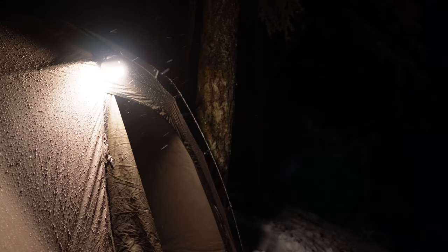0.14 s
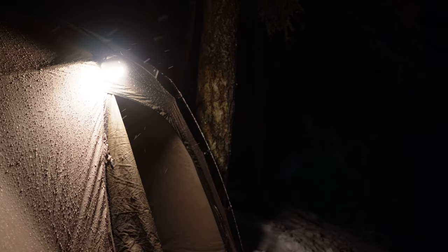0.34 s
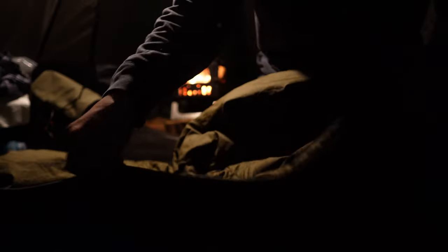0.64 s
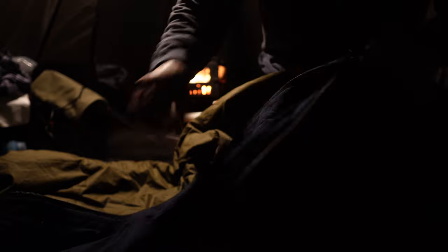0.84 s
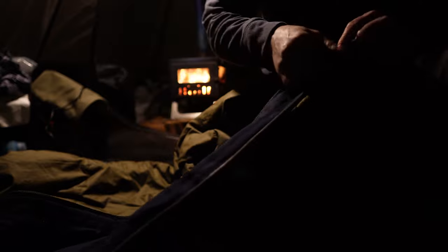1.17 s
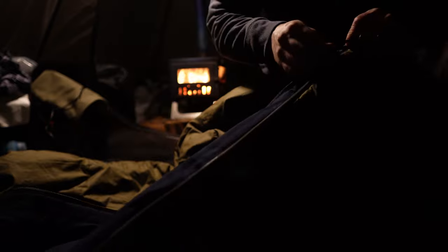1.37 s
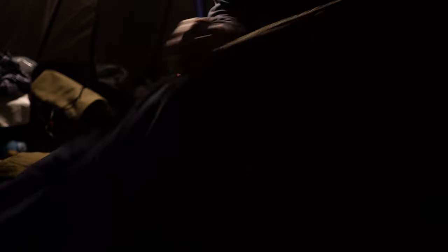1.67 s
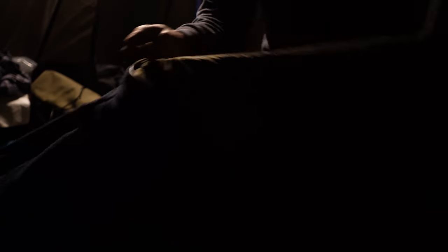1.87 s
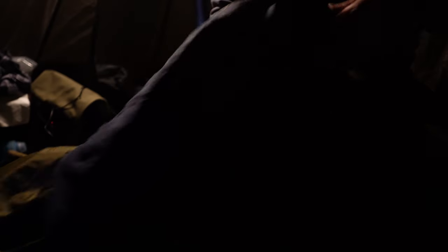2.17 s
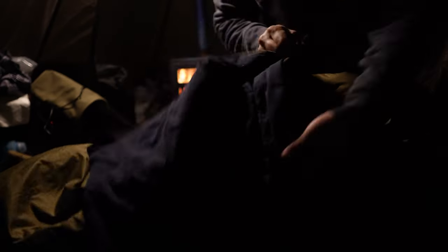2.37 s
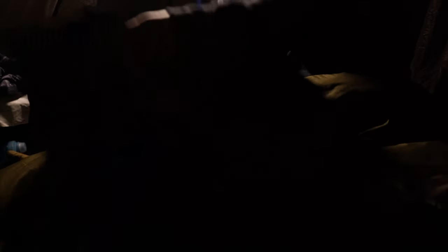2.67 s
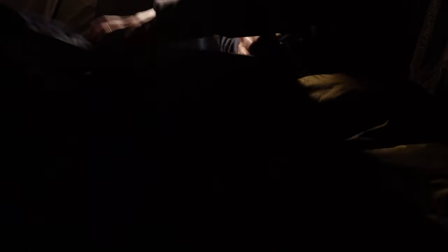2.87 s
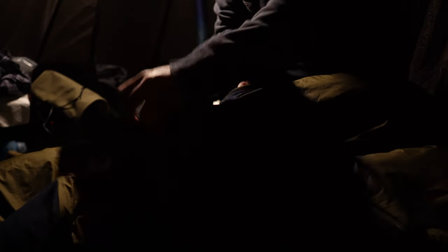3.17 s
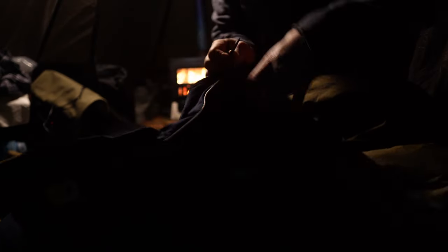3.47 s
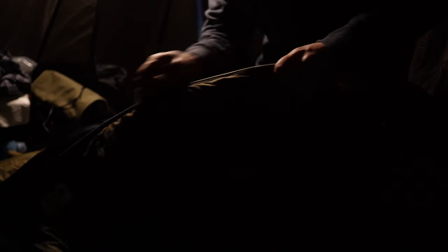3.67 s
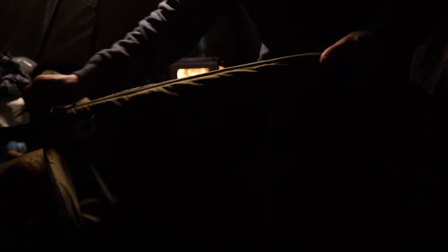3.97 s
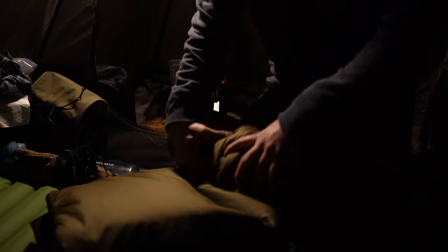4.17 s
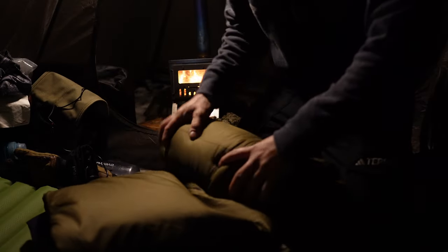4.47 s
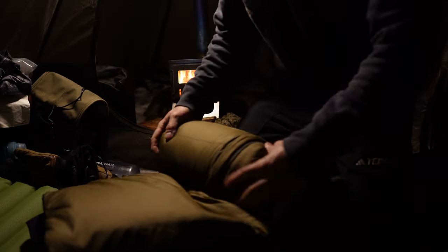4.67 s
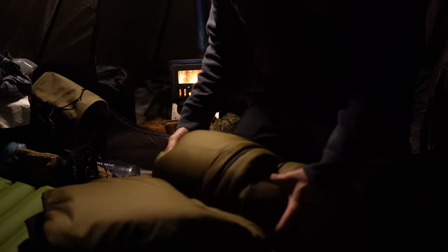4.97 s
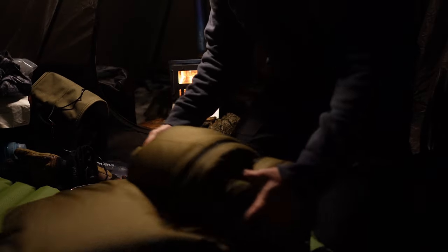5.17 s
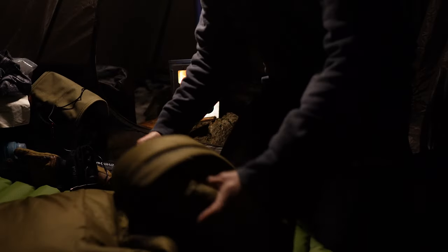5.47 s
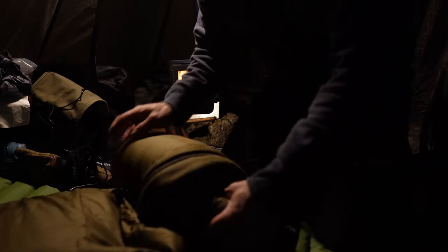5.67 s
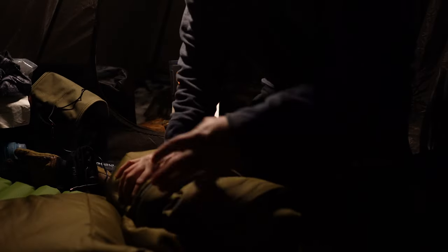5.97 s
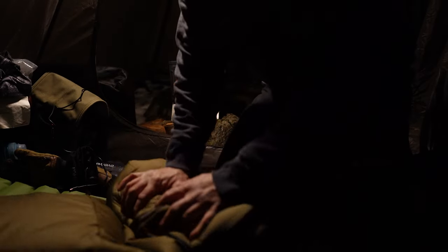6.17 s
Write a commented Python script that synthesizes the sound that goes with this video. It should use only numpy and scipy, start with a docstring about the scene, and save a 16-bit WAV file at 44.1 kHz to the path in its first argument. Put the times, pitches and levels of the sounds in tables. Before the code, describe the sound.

For half a second, wind buffets the microphone and sleet ticks on a tent wall. Then, inside the tent, nylon sleeping bags swish and crumple close to the microphone, with sharp little snaps. A zipper buzzes in a quick pull, its tab clicks, and a second pull follows. The rustling goes on in stronger strokes as a bag is rolled, over a faint low stove rumble.

```python
"""Nylon sleeping bags shaken out, zipped and rolled inside a tent, close to a single microphone.
Two zipper pulls buzz at the tooth rate; the sliding cloth swishes, crumples and snaps, and a stove
rumbles softly behind. The first half second is outside the tent, where wind buffets the microphone
and sleet ticks on the wall."""
import sys
import numpy as np
from scipy import signal
from scipy.fft import rfft, irfft
from scipy.io import wavfile
from scipy.ndimage import uniform_filter1d

SR = 44100
rng = np.random.default_rng(int(sys.argv[2]) if len(sys.argv) > 2 else 0)


def to_wav(sig):
    """Store sig (one row per channel, or 1-D mono) as 16-bit WAV at the path in sys.argv[1].

    Samples outside -1..1 are clipped; the rate is SR.
    """
    pcm = np.clip(np.atleast_2d(sig), -1, 1) * 32767
    pcm = np.round(pcm).astype(np.int16)
    wavfile.write(sys.argv[1], SR, pcm.T)  # frames by channels


N = 279153
T = np.arange(N) / SR
INSIDE_S = .4745  # from here on the microphone is in the tent


def undb(db):
    return 10 ** (np.asarray(db) / 20)


def unit(x):
    return x / np.sqrt(np.mean(x ** 2))


def curves(table):
    """A gate that is open while the table lasts, and its columns on the sample grid."""
    s, *columns = np.transpose(table)
    gate = uniform_filter1d(1. * ((T > s[0]) & (T < s[-1])), size=64)
    return gate, [np.interp(T, s, c) for c in columns]


def colour(x, points):
    """Causal filter shaped by (f/Hz, level/dB) points; the result has unit RMS."""
    hz, db = np.transpose(points)
    f = np.maximum(np.fft.rfftfreq(8192, 1 / SR), 1)
    gain_db = np.interp(np.log(f), np.log(hz), db, left=-60, right=-60)
    cepstrum = irfft(gain_db * np.log(10) / 20)
    cepstrum[1:4096] *= 2  # folding gives minimum phase
    cepstrum[4097:] = 0
    return unit(signal.fftconvolve(x, irfft(np.exp(rfft(cepstrum))))[:N])


def ring(x, hz, width):
    """One resonance, gain 1 at its centre."""
    return signal.lfilter(*signal.iirpeak(hz, hz / width, SR), x)


def walk(rate):
    """Random levels held 1 / rate s and slewed; spread near 1."""
    k = int(SR / rate)
    return 1.18 * uniform_filter1d(np.repeat(rng.standard_normal(N // k + 1), k), k)[:N]


def grains(per_s, spread_db, mix_db):
    """Smooth noise plus scattered slips of unequal but bounded size."""
    size = undb(spread_db * np.minimum(rng.exponential(size=N), 3))
    slip = (rng.random(N) < per_s / SR) * rng.uniform(-1.01, 1, N) * size
    return rng.standard_normal(N) + undb(mix_db) * unit(slip)


def hits(table, crack, t60=None):
    """A damped ring for each row; crack adds a sharp push and a noise burst around its pitch."""
    out, t = np.zeros(N + SR), np.arange(SR // 2) / SR
    push = 1.77 * np.exp(-(t / 0.00006 - 2) ** 2)
    for s, db, hz, *own_t60 in table:
        fade = undb(-60 * t / (own_t60[0] if own_t60 else t60))
        burst = 3.35 * ring(rng.standard_normal(len(t)), hz, 0.8 * hz)
        hit = fade * (np.sin(2 * np.pi * hz * t) + crack * burst) + crack * push
        out[int(s * SR):][:len(t)] -= undb(db) * hit / np.abs(hit).max()
    return out[:N]


# low roar behind the bags: f/Hz, level/dB
RUMBLE_COLOUR = [(20, -10), (40, -6), (70, -4), (110, -3), (190, -2.5), (260, -11.5), (400, -27)]
# soft knocks through the tent floor: t/s, peak level/dB, f/Hz, t60/s
FLOOR_KNOCKS = [(2.209, -33.5, 56.18, 0.13), (5.029, -46, 48.4, 0.2), (5.249, -53, 83.9, 0.2),
                (5.589, -33, 38.1, 0.15)]


def stove_and_floor(stove_db=-54.5):
    """The stove roars low, bedding shifts as the cloth is crumpled, and knocks come through the floor."""
    since = T - INSIDE_S
    _, _, crumple = strokes()
    bedding = undb(-9.5) * crumple
    last_gust = undb(-35) * np.exp(-np.abs(since) / 0.028)  # the wind dies away on entering the tent
    strength = (since > 0) * np.sqrt(undb(stove_db) ** 2 + bedding ** 2 + last_gust ** 2)
    roar = colour(rng.standard_normal(N), RUMBLE_COLOUR) * undb(1.7 * walk(15))
    return strength * roar + hits(FLOOR_KNOCKS, crack=0)


# wind outside the tent: t/s, buffeting level/dB, wall hiss level/dB
WIND = [(0.0, -27, -55), (0.312, -27, -55.5), (.4745, -32.5, -51)]
# buffeting right on the microphone: f/Hz, level/dB
WIND_COLOUR = [(15, 4), (40, 0.5), (70, 0.5), (120, -16), (250, -31.5), (500, -46)]
# hiss on the tent wall: f/Hz, level/dB
WALL_COLOUR = [(400, 10.5), (1000, -5.5), (3000, -1.5), (5500, -4), (7000, -9), (16000, -23)]
# largest sleet grains on the wall: t/s, peak level/dB, f/Hz
SLEET = [(0.0538, -35, 2820), (0.0634, -37, 2580), (0.0784, -40, 5390), (0.1067, -35, 4770),
         (0.145, -35, 2700), (0.2174, -41, 2400), (0.282, -35, 2900), (0.315, -32, 3760),
         (0.3401, -39, 2710), (0.3736, -45, 2390)]


def wind_and_sleet():
    """Outside, gusts buffet the microphone while sleet hisses and ticks on the wall."""
    gate, (gust_db, hiss_db) = curves(WIND)
    gusts = colour(rng.standard_normal(N), WIND_COLOUR) * undb(gust_db + 1.3 * walk(20.3))
    hiss = colour(grains(400, 3.5, -0.58), WALL_COLOUR) * undb(hiss_db + 4.7 * walk(63.4))
    return gate * (gusts + hiss) + hits(SLEET, crack=0.71, t60=0.0088)


def tent_echoes(near, decay_s=0.011):
    """The tent walls return short, soft echoes of the sounds near the microphone."""
    t = np.arange(SR // 10) / SR
    tail = rng.standard_normal(len(t)) * np.exp(-t / decay_s)
    return undb(-31.5) * signal.fftconvolve(near, tail)[:N]


# faint squeaks on the bags: start t/s, end t/s, start f/Hz, end f/Hz, width/Hz, level/dB
SQUEAKS = [(0.701, 0.766, 791, 2627, 500, -40.5), (.885, 0.992, 3730, 3710, 200, -47),
           (.89, 0.99, 3070, 2880, 254, -46), (0.886, .99, 1610, 1515, 250, -46),
           (1.12, 1.214, 848, 885, 121, -45), (4.294, 4.343, 1490, 1915, 500, -37),
           (5.649, 5.712, 1514, 5490, 1180, -36.5), (5.782, 5.847, 2800, 3840, 1500, -35)]


def squeaks():
    """A finger or seam drawn across the weave sings: narrow noise gliding with the stroke's speed."""
    out = np.zeros(N)
    for start, end, from_hz, to_hz, width, db in SQUEAKS:
        i, n = int(start * SR), int((end - start) * SR)
        slow = uniform_filter1d(rng.standard_normal((2, SR // 4)), int(SR / width))[:, :n]
        phase = 2 * np.pi * np.cumsum(np.linspace(from_hz, to_hz, n)) / SR
        band = unit(slow[0] * np.cos(phase) + slow[1] * np.sin(phase))
        out[i:i + n] += undb(db) * np.hanning(n) ** .5 * band
    return out


# the zipper tab clicking, close: t/s, peak level/dB
TAB_CLICKS = [(2.5843, -15)]
# modes of the tab: f/Hz, relative level/dB, t60/s
TAB_MODES = [(990, -1, .02), (1525, 5.5, 0.023), (2020, 1, 0.022), (2520, -5, .015), (4540, -3, .022),
             (5470, -5, .01)]


def zipper_tab():
    """The tab strikes the slider and rings in a few small modes."""
    t, out = np.arange(SR // 10) / SR, np.zeros(N)
    for s, peak_db in TAB_CLICKS:
        click = sum(undb(db + 2.0 * rng.standard_normal() - 60 * t / t60) * np.sin(2 * np.pi * hz * t)
                    for hz, db, t60 in TAB_MODES)
        out[int(s * SR):][:len(t)] -= undb(peak_db) * click / np.abs(click).max()
    return out


# snaps close to the microphone: t/s, peak level/dB, f/Hz
SNAPS = [(0.4763, -17, 722), (0.4952, -15.5, 760), (0.7167, -20.5, 1680), (0.7477, -25, 1850),
         (0.8237, -29.5, 2147), (1.0547, -22.5, 2876), (1.2045, -23, 11700), (1.3499, -22, 1520),
         (1.3551, -28, 940), (1.3571, -16.5, 2520), (1.8191, -17, 1400), (2.2182, -18.5, 1120),
         (2.5297, -19, 1350), (3.0031, -29, 1030), (3.4881, -24.5, 4300), (3.5064, -25, 960),
         (3.5315, -18, 405), (4.2241, -19.5, 970), (4.4792, -16, 490), (4.5492, -23.5, 3606),
         (4.8274, -16, 3596), (5.229, -13, 2940), (5.2365, -16, 970), (5.2553, -23, 1203),
         (5.3285, -20, 486), (5.4705, -28, 1740), (5.5288, -19.5, 537), (5.5732, -15.5, 2200),
         (6.073, -19, 1290), (6.259, -15.5, 1258), (6.2977, -14.5, 565), (6.3226, -12.5, 890)]


def snaps():
    """Cloth and toggles snap with a crack and a very short ring."""
    return hits(SNAPS, crack=0.73, t60=0.011)


def scrape():
    """Strength of the slider's scrape on the tape: a power of the tooth rate, 1 at 1000 teeth a second."""
    return sum(gate * (hz / 1000) ** 0.91 for gate, (hz, _) in map(curves, (PULL_1, PULL_2)))


# hand strokes, close: fastest t/s, rise/s, fall/s, swish level/dB, sheen re swish/dB, crumple re swish/dB
STROKES = [(.49, 0.05, 0.099, -38.5, -6, -0.5), (.55, 0.056, 0.31, -40, -6.5, -5),
           (.74, 0.047, .07, -40, -6.5, -5.5), (.92, 0.16, 0.14, -43.5, -7.5, -9),
           (1.19, 0.18, 0.091, -41.5, -6, -7), (1.351, 0.057, 0.018, -43, -10, -12),
           (1.88, 0.11, 0.18, -37, -8, -4.5), (2.09, 0.16, 0.23, -38.5, -7.5, -1.5),
           (2.23, 0.079, 0.15, -37.5, -7.5, -6), (2.42, 0.22, 0.15, -37.5, -6, -4),
           (2.63, 0.074, 0.094, -40.5, -7, -3.5), (2.73, 0.097, 0.16, -39, -6, -6.5),
           (2.9, 0.15, 0.12, -40, -6.5, -5), (3.09, .13, 0.053, -40.5, -5, -2.5),
           (3.15, 0.052, 0.12, -52.5, -2.5, 3.5), (3.5, 0.02, 0.45, -39.5, -4, -1.5),
           (4.0, 0.046, 0.031, -30.5, -10, -9), (4.09, 0.056, 0.14, -35, -5.5, -6),
           (4.29, 0.23, 0.11, -35.5, -6, -2), (4.46, 0.12, 0.077, -32.5, -5.5, -11),
           (4.66, 0.21, 0.12, -35.5, -6.5, -6.5), (4.8, 0.21, 0.18, -32.5, -5, -9),
           (4.828, 0.016, 0.02, -30, -11.5, -13), (5.0, 0.097, 0.14, -38, -7.5, 2.5),
           (5.23, 0.19, 0.19, -31, -5.5, -2), (5.5, 0.19, 0.15, -39, -6, 1),
           (5.68, 0.063, 0.07, -38, -6, -4), (5.82, .1, 0.098, -37, -8, -11.5),
           (5.91, 0.11, 0.058, -36, -3.5, -2), (6.079, 0.036, 0.23, -37.5, -4.5, 0),
           (6.3, 0.1, .1, -38, -9.5, 3)]
RESTING_DB, SCRAPE_DB = (-50, -7.5, -3), (-34.5, -3.5, -9.5)  # the same three levels


def strokes(flank_power=1.146):
    """Strength of swish, sheen and crumple: hands and slider add as powers over the cloth at rest."""
    def powers(swish_db, sheen_db, crumple_db):
        return undb([[swish_db], [swish_db + sheen_db], [swish_db + crumple_db]]) ** 2

    power = powers(*RESTING_DB) + powers(*SCRAPE_DB) * scrape() ** 2
    for s, rise, fall, *db in STROKES:
        away = np.clip(np.where(T < s, (s - T) / rise, (T - s) / fall), 0, 1)
        power += powers(*db) * np.abs(np.cos(np.pi / 2 * away)) ** (2 * flank_power)
    return np.sqrt(power) * (T > INSIDE_S)


# nylon at close range, in its middle, top and low bands: f/Hz, level/dB
SWISH = [(1200, -9), (1800, 0.5), (2600, 2.5), (3800, 2), (5200, -0.5), (6500, -1), (8000, -16)]
SHEEN = [(5500, -22), (6800, -0.5), (8200, -3), (10000, -8), (12500, -8), (14800, -15), (16000, -14)]
CRUMPLE = [(150, -5.5), (260, 4), (420, 2), (800, 3), (1200, 0.5), (1700, -0.5), (2500, -15)]


def cloth():
    """Nylon slides on nylon: the same fibre slips feed swish and sheen, larger folds crumple lower."""
    fibres, folds = grains(2000, 1.3, -7.5), grains(200, 5.8, -3.5)
    drag = walk(30)  # the sliding speed is never even
    swish = colour(fibres + 0.34 * folds, SWISH) * undb(0.81 * drag + 0.53 * walk(90))
    sheen = colour(fibres, SHEEN) * undb(1.2 * drag + 0.622 * walk(90))
    crumple = colour(folds, CRUMPLE) * undb(2.0 * drag + 1.02 * walk(40))
    top_hiss = unit(ring(rng.standard_normal(N), hz=12500, width=4400))
    slider_hiss = undb(SCRAPE_DB[0] - 11.5) * scrape() * top_hiss
    return np.sum(strokes() * [swish, sheen, crumple], axis=0) + slider_hiss


# the two zipper pulls, close to the microphone: t/s, tooth rate f/Hz, drive level/dB
PULL_1 = [(1.49, 140, -59), (1.524, 267, -49.5), (1.58, 640, -31.5), (1.62, 930, -26), (1.66, 1130, -24.5),
          (1.7, 1170, -28.5), (1.74, 1124, -28), (1.76, 920, -32), (1.785, 760, -41), (1.805, 490, -38),
          (1.85, 440, -40.5), (1.9, 280, -61)]
PULL_2 = [(3.58, 238, -42.5), (3.605, 427, -32), (3.634, 657, -23), (3.664, 760.5, -21),
          (3.694, 829.5, -25.5), (3.719, 777.7, -25), (3.74, 836.4, -29), (3.8, 724.4, -36),
          (3.86, 569, -39), (3.921, 531.6, -39.5), (3.961, 758, -38), (4.0, 659, -35), (4.039, 470, -58.5)]
# resonances of each bag's slider and taut cloth: f/Hz, width/Hz, relative level/dB
BAG_1 = [(320, 470, 3.5), (765, 510, 8), (1077, 335, 6), (1740, 390, 3.5), (2230, 400, -4.5),
         (2980, 1100, -4), (4360, 570, -2.5), (5950, 2400, -12.5)]
BAG_2 = [(388, 146, 4.5), (640, 327, 6.5), (864, 314, 4.5), (1130, 310, 3.5), (1600, 260, 2.5),
         (2500, 740, -2), (2910, 300, 1), (3830, 490, -4), (5700, 2400, -12)]


def zipper(pull, bag, second_lag, second_db, ragged, scatter_db=0.92):
    """Each tooth clicks entering the slider and again second_lag periods later; slider and cloth ring."""
    gate, (hz, db) = curves(pull)
    since, length = T - pull[0][0], pull[-1][0] - pull[0][0]
    jitter_teeth = .014 + ragged * np.clip(since / length, 0, 1) ** 4.5  # grows late in the pull
    count = np.cumsum(gate * hz * (1 + .013 * walk(110))) / SR  # the hand trembles
    teeth = np.arange(1, int(count[-1]) - 1)
    chance = rng.standard_normal((len(teeth), 4)).T
    force = undb(db) * SR / hz / np.sqrt(2)
    due = np.interp(teeth, count, np.arange(N)).astype(int)
    clicks = np.zeros(N)
    for shift, gain, (jitter, scatter) in ((0, 1, chance[:2]), (second_lag, undb(second_db), chance[2:])):
        at = np.interp(teeth + shift + jitter_teeth[due] * jitter, count, np.arange(N))
        size = gain * force[due] * undb(scatter_db * scatter)
        for k in range(-7, 9):  # a windowed sinc lets the click fall between samples
            lag = k - at % 1
            np.add.at(clicks, at.astype(int) + k, size * np.sinc(lag) * np.cos(np.pi * lag / 16) ** 2)
    tautness = np.tanh((since - 0.14) / 0.044)  # the tape goes from slack (-1) to taut (1)
    bite_db = np.interp(tautness, [-1, 1], [-17, 2])  # taut tape brings out the high resonances
    out = np.zeros(N)
    for k, (mode_hz, width, mode_db) in enumerate(bag):
        flutter_db = 3.5 * np.minimum(walk(60), 1)  # the cloth changes shape under the hand
        bite_share = np.interp(mode_hz, (960, 2800), [0, 1])
        out += (-1) ** k * undb(mode_db + flutter_db + bite_share * bite_db) * ring(clicks, mode_hz, width)
    return out


def scene():
    """A moment outside, then the bags up close in the tent; one microphone on both channels."""
    near = zipper(PULL_1, BAG_1, second_lag=0.515, second_db=-12.0, ragged=.25)
    near += zipper(PULL_2, BAG_2, second_lag=0.16, second_db=-15.5, ragged=0.037)
    near += snaps() + zipper_tab()
    mono = near + tent_echoes(near) + wind_and_sleet() + cloth() + squeaks() + stove_and_floor()
    return np.array([mono, mono])


def record(dry):
    """The microphone's top is cut steeply above 15850 Hz."""
    return signal.sosfilt(signal.ellip(12, .2, 80, 15850, fs=SR, output="sos"), dry)


dry = scene()
out = record(dry)
to_wav(out)
```